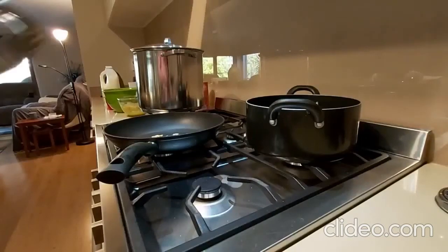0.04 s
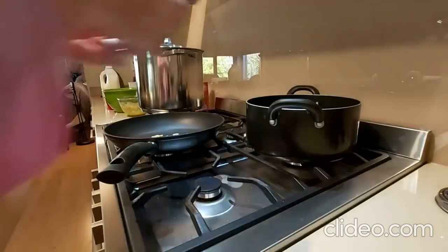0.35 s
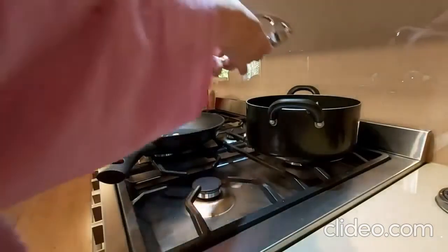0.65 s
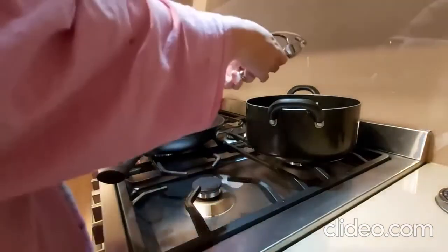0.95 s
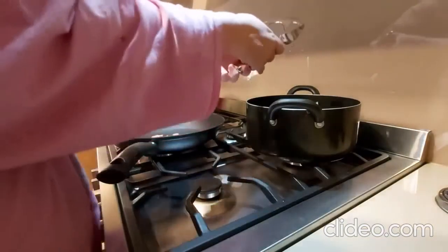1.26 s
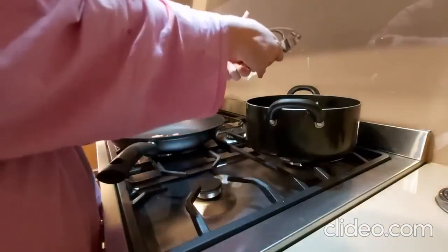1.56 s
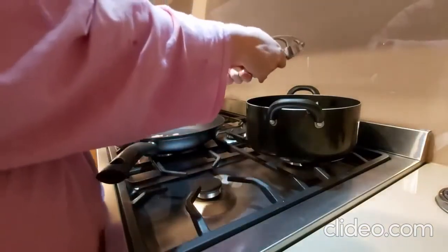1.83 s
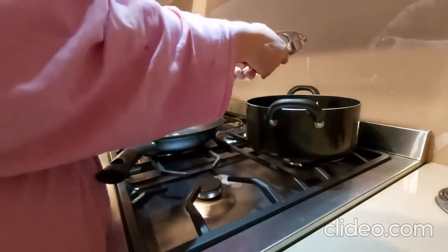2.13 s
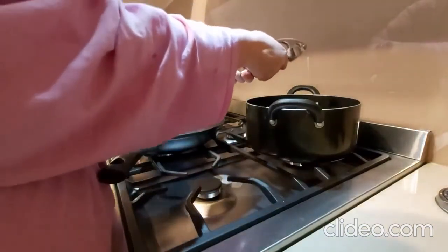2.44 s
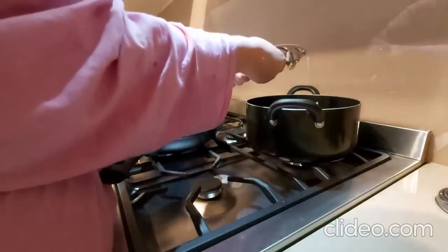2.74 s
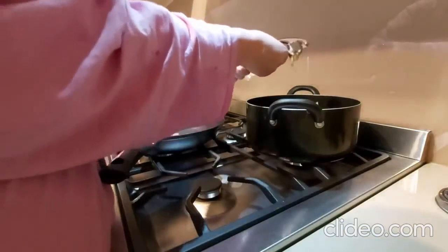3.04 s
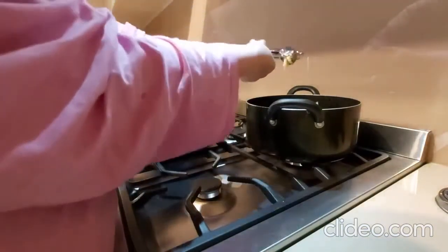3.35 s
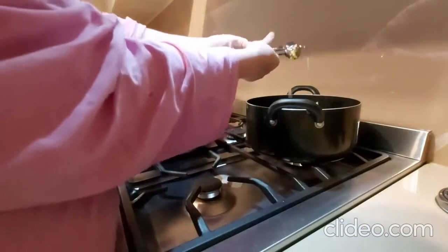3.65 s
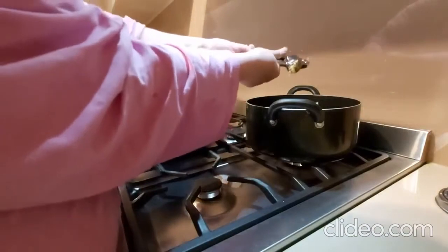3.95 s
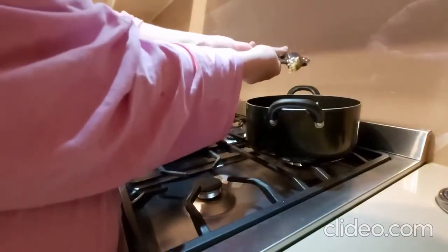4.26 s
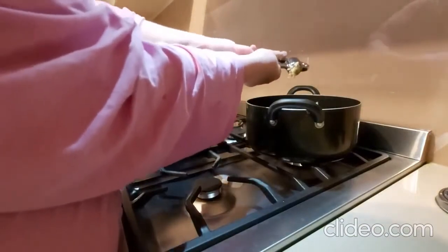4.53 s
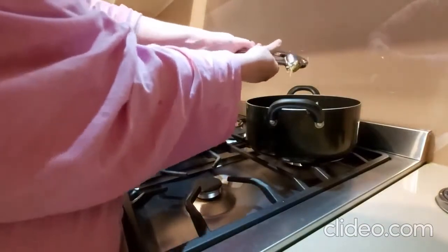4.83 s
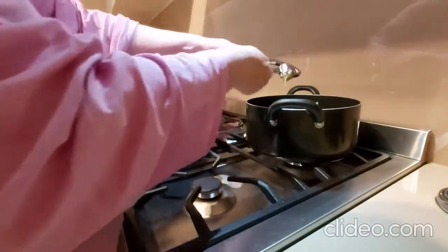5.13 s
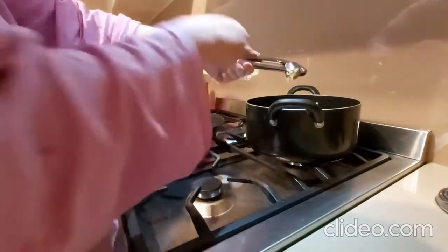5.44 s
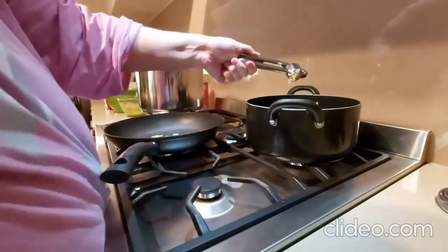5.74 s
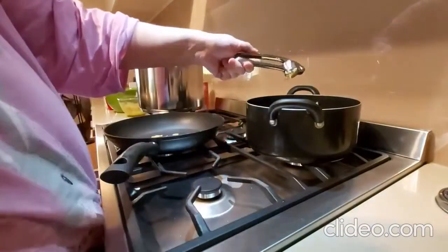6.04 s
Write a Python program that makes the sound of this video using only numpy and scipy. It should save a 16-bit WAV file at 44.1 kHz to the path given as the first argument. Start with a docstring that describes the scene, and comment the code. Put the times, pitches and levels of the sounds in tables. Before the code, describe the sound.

A steady low hum, like a fan, fills a small kitchen. Close to the microphone, a loose sleeve rustles softly throughout as someone handles steel tongs. The tongs give short runs of light, bright clicks and scrapes with a faint ring, mostly in the first half. After that it is mainly the rustling cloth, with a few soft, dull handling bumps over the hum.

```python
"""A steady low hum, like a fan's, fills a small kitchen, and a loose sleeve rustles over it
as its fibres catch and let go. Steel tongs are gripped and shifted in the hands above a stove,
close to a phone. Steel slips on steel in short runs of clicks and scrapes that rattle the hinge
and leave the arms ringing faintly. The handling adds a few soft bumps."""
import sys
import numpy as np
from scipy import signal
from scipy.fft import rfft, irfft
from scipy.io import wavfile
from scipy.ndimage import uniform_filter1d

SR = 44100
rng = np.random.default_rng(int(sys.argv[2]) if len(sys.argv) > 2 else 0)


def wav_out(sig):
    """Save sig, one row per channel (or a flat mono array), as 16-bit PCM at SR to the path in sys.argv[1]."""
    wavfile.write(sys.argv[1], SR, np.round(np.clip(np.atleast_2d(sig).T, -1, 1) * 32767).astype(np.int16))


N = 268569
TIME_S = np.arange(N) / SR
FREQ_HZ = np.maximum(np.arange(N // 2 + 1) * SR / N, 1)


def undb(db):
    """Decibels to gain."""
    return 10 ** (np.asarray(db) / 20)


def unit_rms(x):
    """Scale to an rms of one."""
    return x / np.sqrt(np.mean(x ** 2))


def curve(points, column=1, freq_hz=FREQ_HZ):
    """One table column, interpolated over log frequency."""
    table = np.array(points, float)
    return np.interp(np.log(freq_hz), np.log(table[:, 0]), table[:, column])


def colour(x, spectrum):
    """Shape the spectrum of x, keeping the power of white input."""
    return irfft(rfft(x) * unit_rms(undb(curve(spectrum))), N)


def noise():
    """Two independent white noises, one per path to the microphones."""
    return rng.standard_normal((2, N))


def wander(per_s):
    """Random levels, held 1 / per_s seconds and smoothed twice; unit rms."""
    hold = int(SR / per_s)
    steps = np.repeat(rng.standard_normal(N // hold + 1), hold)
    return unit_rms(uniform_filter1d(uniform_filter1d(steps, hold), hold)[:N])


def slips(per_s, spread_db):
    """Dense train of tiny clicks of uneven size."""
    happens = rng.random(N) < per_s / SR
    size = undb(spread_db * np.minimum(rng.exponential(size=N), 4))
    return unit_rms(noise() * happens * size)


def swell(peak_s, rise_s, fade_s):
    """Pressure builds exponentially to a peak, then lets go."""
    out = np.zeros(N)
    near = slice(*np.searchsorted(TIME_S, [peak_s - 10 * rise_s, peak_s + 10 * fade_s]))
    t = TIME_S[near] - peak_s
    out[near] = np.exp(-np.maximum(-t / rise_s, t / fade_s))
    return out


def shimmer(x, depth_db):
    """Each strip of the spectrum swells and sinks at random, giving a patchy, flickering texture."""
    cells = signal.stft(x, nperseg=256)[2]
    drift = rng.standard_normal(cells.shape[1:])
    for axis in (0, 1, 1):  # once over frequency, twice over time
        drift = uniform_filter1d(drift, 6, axis=axis)
    gain = unit_rms(undb(depth_db * unit_rms(drift)))
    return signal.istft(cells * gain)[1][:, :N]


def resonance(hz, width_hz):
    """Gain over frequency of a steep-sided resonance."""
    return 1 / (1 + ((FREQ_HZ ** 2 - hz ** 2) / (FREQ_HZ * width_hz)) ** 2)


# Moving air. Each row: frequency in Hz, relative density in dB.
AIR_SPECTRUM = [(20, -46), (50, -18), (80, -14.5), (105, -5), (200, -7.5), (250, 3), (340, -0.5), (450, -1),
                (550, -17.5), (750, -12), (860, -15.5), (980, -13), (1200, -20.5), (1400, -18.5),
                (1900, -37), (6000, -73)]
# Resonances in the hum. Each row: centre in Hz, width in Hz, rms level in dB.
HUM_RESONANCES = [(109.4, 11, -71), (160.8, 26.5, -67), (334.8, 26, -61), (445, 25, -65.5),
                  (690, 44, -77.5), (1058, 36, -72)]
# Brief swells and dips of the low hum. Each row: centre in seconds, change in dB.
HUM_SURGES = [(0.66, -5.5), (1.48, 4), (1.66, 4.5), (2.42, 5), (2.54, 3), (3.71, 5.5), (3.98, -5.5),
              (4.13, -5)]


def hum(air_db=-53.5, surge_s=0.028, surge_below_hz=520):
    """Moving air, mostly below 500 Hz, with narrow resonances; the low part swells and dips."""
    air = undb(air_db + 0.84 * wander(per_s=12)) * colour(noise(), AIR_SPECTRUM)
    peaks = sum(undb(db) * unit_rms(resonance(hz, width_hz)) for hz, width_hz, db in HUM_RESONANCES)
    steady = air + irfft(rfft(noise()) * peaks, N)
    low = irfft(rfft(steady) * (FREQ_HZ < surge_below_hz), N)
    surge_db = sum(db * np.exp(-((TIME_S - at_s) / surge_s) ** 2) for at_s, db in HUM_SURGES)
    return steady + (undb(surge_db) - 1) * low


# Handling bumps and rubs. Each row: peak in seconds, level in dB, centre in Hz, width in octaves.
HANDLING_BUMPS = [(2.775, -52.5, 113, 0.74), (4.36, -51, 115, 0.33), (4.422, -55.5, 1040, 0.19),
                  (4.465, -49, 362, 0.72), (4.49, -47.5, 150, 0.8), (4.87, -55.5, 136, 0.45),
                  (5.95, -58, 127, 1)]


def bumps(rise_s=0.033, fade_s=0.026):
    """Soft contacts, too slow to click: each is a short swell in one noise band."""
    out, rubbing = np.zeros((2, N)), noise()
    for peak_s, db, hz, octaves in HANDLING_BUMPS:
        edges_hz = hz * 2 ** (np.array([-0.5, 0.5]) * octaves)
        band = signal.butter(2, edges_hz, "band", fs=SR, output="sos")
        out += undb(db) * swell(peak_s, rise_s, fade_s) * unit_rms(signal.sosfilt(band, rubbing))
    return out


# Briskness of the sleeved arm. Each row: time in seconds, relative rustle level in dB.
ARM_MOTION = [(0, -57.5), (0.3, -56.5), (0.7, -54.5), (0.92, -57.5), (1.14, -57.5), (1.38, -59),
              (1.56, -58.5), (1.76, -53), (1.94, -56), (2.12, -62.5), (2.28, -49), (2.42, -58.5),
              (2.6, -61), (2.76, -52.5), (2.98, -57.5), (3.42, -60.5), (3.9, -58.5), (4.12, -69),
              (4.27, -59), (4.66, -56.5), (4.78, -59), (5.1, -59.5), (5.3, -61), (5.42, -57.5), (5.52, -55),
              (5.74, -53), (5.82, -58.5), (6.09, -58.5)]
# Light brushes of sleeve and fingers, and drags of the heavy folds.
# Each row: peak in seconds, level in dB, rise and fade time in seconds.
LIGHT_BRUSHES = [(0.10, -56, 0.11), (0.298, -50.5, 0.0057), (0.356, -48, 0.015), (0.431, -47.5, 0.021),
                 (0.559, -48, 0.019), (0.655, -54, 0.018), (1.07, -48.5, 0.021), (1.299, -54, 0.011),
                 (1.665, -52.5, 0.053), (2.05, -57.5, 0.031), (2.215, -50.5, 0.036), (2.32, -50, 0.029),
                 (2.391, -50, 0.0064), (2.46, -48, 0.011), (2.66, -47, 0.025), (2.696, -45.5, 0.018),
                 (2.815, -53.5, .028), (2.872, -46.5, .017), (3.049, -54, 0.015), (3.199, -52.5, 0.0085),
                 (4.068, -56.5, 0.064), (4.145, -55.5, 0.091), (4.203, -48, 0.0091), (4.335, -54.5, 0.017),
                 (4.43, -55, .016), (4.845, -57, 0.023), (5.135, -54, 0.06), (5.22, -51.5, 0.0078),
                 (5.362, -53, 0.0084), (5.89, -54.5, 0.024), (5.987, -53.5, 0.05)]
FOLD_DRAGS = [(0.42, -60, 0.15), (0.90, -64, 0.066), (2.565, -61.5, 0.038), (2.72, -73, 0.045),
              (4.19, -69, 0.027), (4.911, -57.5, 0.036), (5.54, -66, 0.091), (5.72, -61, 0.19),
              (6.0, -64, 0.13)]
# Bright fibres and dull folds. Each row: frequency in Hz, relative density in dB.
FIBRE_SPECTRUM = [(1500, -7.5), (3400, -23), (4200, -6.5), (5300, -8.5), (6500, -5), (7400, 1.5),
                  (9500, -1.5), (12000, 0.5), (14000, -2.5), (16000, -8.5)]
FOLD_SPECTRUM = [(60, -3), (400, 4), (1200, 3.5), (1800, -13.5), (2400, 0.5), (3400, -6), (4400, 1.5),
                 (6000, -35), (12000, -18)]


def sleeve(fibre_db=-3.5, fold_db=-14):
    """Fibres catch and let go as the arm moves; the heavy folds rub with a duller sound."""
    sway_db = 1.1 * wander(per_s=16)
    motion = undb(np.interp(TIME_S, *np.transpose(ARM_MOTION)) + sway_db)
    catching = undb(1.7 * wander(per_s=70))
    brush_power = sum((undb(db) * swell(at_s, tau_s, tau_s)) ** 2 for at_s, db, tau_s in LIGHT_BRUSHES)
    drag_power = sum((undb(db) * swell(at_s, tau_s, tau_s)) ** 2 for at_s, db, tau_s in FOLD_DRAGS)
    fibre_level = np.sqrt((undb(fibre_db) * motion * catching) ** 2 + brush_power)
    fold_level = np.sqrt((undb(fold_db) * motion) ** 2 + drag_power) * catching
    fibres = colour(fibre_level * slips(per_s=18000, spread_db=0.6), FIBRE_SPECTRUM)
    folds = colour(fold_level * slips(per_s=3500, spread_db=-1.1), FOLD_SPECTRUM)
    return shimmer(fibres + folds, depth_db=3.0)


# Steel arms at a pitch of ARM_PITCH_HZ. Each row: frequency in Hz, relative gain in dB.
ARM_SPECTRUM = [(100, -27), (600, -1), (1700, -31), (2350, -4), (3200, -5), (4100, 18), (5400, 11),
                (6500, 5), (9000, -51), (16000, -38)]
ARM_PITCH_HZ = 4100


def arm_response(pitch_hz, size=256):
    """Short impulse response of the steel arms; a closer grip raises their pitch."""
    freq_hz = np.maximum(np.arange(size // 2 + 1) * SR / size, 1)
    gain = undb(curve(ARM_SPECTRUM, freq_hz=freq_hz * ARM_PITCH_HZ / pitch_hz))
    response = np.roll(irfft(gain), size // 2) * np.hanning(size)
    return response[None] / np.linalg.norm(response)


# Modes of the steel arms. Each row: frequency in Hz, relative level in dB, T60 in seconds.
ARM_MODES = [(2330, 11, .16), (2918, 2, .08), (3413, 2, .06), (3898, -5, .18), (4008, -1, .14),
             (4059, 0, .12), (4114, 0, .1), (4228, -2, .14), (4326, -3, .1), (4485, -1, .16),
             (4752, -5, .12), (5030, -1, .07), (5152, -2, .12), (5249, -2, .14), (5434, -2, .14),
             (5539, -2, .12), (6181, 0.5, .25), (7832, 3, .16)]


def arm_ring(shake):
    """The shaken arms ring on in their modes, damped by the hand."""
    t = TIME_S[:SR // 4]
    ring = sum(undb(db) * np.sin(2 * np.pi * hz * t) * np.exp(-np.log(1000) * t / t60_s)
               for hz, db, t60_s in ARM_MODES)
    return signal.oaconvolve(shake, ring[None] / np.linalg.norm(ring), axes=1)[:, :N]


# Clicks and scrapes. Each row: peak in seconds, relative level in dB, rise in seconds,
# fade in seconds, arm share in dB, arm pitch in Hz, knock share in dB.
TONG_CONTACTS = [ (0.773, -41, 0.024, 0.0063, -3, 4020, -35), (0.814, -40.5, 0.0054, 0.0046, 0, 4000, -30),
                 (0.826, -37.5, 0.0018, 0.002, 3.5, 4100, -32),
                 (0.8293, -32, 0.00025, 0.0031, 3.5, 4120, -33), (0.835, -40.5, 0.001, 0.02, -4, 4300, -19),
                 (0.869, -42.5, 0.0034, 0.048, -5.5, 4300, -18), (0.905, -44, 0.036, 0.043, -9, 4300, -15),
                 (0.966, -46, 0.011, 0.012, -5.5, 4150, -34), (1.011, -39, 0.014, 0.0039, -3.5, 4100, -23),
                 (1.0162, -33.5, 0.0021, 0.0054, -5, 4140, -19.5),
                 (1.04, -51.5, 0.008, 0.054, -5, 4130, -18), (1.225, -52.5, 0.031, 0.016, -12.5, 4100, -28),
                 (1.7026, -40, 0.0004, 0.003, -5, 4660, -26),
                 (1.7043, -35.5, 0.0005, 0.0033, -5, 5500, -24),
                 (1.7116, -39.5, 0.0011, 0.0037, 0, 4600, -28),
                 (1.718, -39.5, 0.0083, 0.024, -6.5, 4800, -26), (1.852, -49, 0.021, 0.02, -9.5, 5170, -36),
                 (2.242, -35.5, 0.0004, 0.0026, -10, 4600, -22),
                 (2.2448, -38, 0.001, 0.01, -7.5, 5130, -24), (2.528, -38, 0.013, 0.017, -19, 5570, -22.5),
                 (2.535, -35, 0.00086, 0.0022, -19, 5600, -18), (2.541, -44, 0.002, 0.016, -21, 5600, -13),
                 (2.718, -42.5, 0.014, 0.019, -10, 3930, -25),
                 (2.876, -54, 0.028, 0.0073, -10, 4040, -14.5), (3.272, -52, 0.0076, 0.0042, -5, 4050, -19),
                 (4.206, -52.5, 0.026, 0.011, -16, 4100, -11)]
# Slipping steel and the dull knock. Each row: frequency in Hz, relative density in dB.
SCRAPE_SPECTRUM = [(200, -6), (1500, -16), (2300, -31), (3200, -25), (4100, -44), (5000, -6), (6400, 6.5),
                   (7800, 10), (11500, 7.5), (14000, 6.5), (16000, -1)]
KNOCK_SPECTRUM = [(150, -23), (600, 5.5), (1300, 8), (1750, 3.5), (2300, 1.5), (3000, 5), (3700, -0.5),
                  (4600, -8), (7000, -37)]


def tongs(scrape_db=-2.5, arms_db=-4.5, ring_db=-8.5):
    """Steel slips on steel; knocks rattle the hinge in the hand and shake the arms."""
    scrape_power, knock_power = np.zeros((2, N))
    arms = np.zeros((2, N))
    chatter = slips(per_s=30000, spread_db=1)
    for peak_s, db, rise_s, fade_s, arm_share_db, pitch_hz, knock_share_db in TONG_CONTACTS:
        force = undb(db) * swell(peak_s, rise_s, fade_s)
        scrape_power += force ** 2
        knock_power += (force * undb(knock_share_db)) ** 2
        near = force > 0
        drive = undb(arm_share_db) * force[near] * chatter[:, near]
        arms[:, near] += signal.fftconvolve(drive, arm_response(pitch_hz), "same", axes=1)
    scrape = colour(np.sqrt(scrape_power) * slips(per_s=30000, spread_db=0.6), SCRAPE_SPECTRUM)
    knock = colour(np.sqrt(knock_power) * noise(), KNOCK_SPECTRUM)
    shake = undb(arms_db) * arms + knock
    contact = shimmer(undb(scrape_db) * scrape + shake, depth_db=1.2)
    return contact + undb(ring_db) * arm_ring(shake)


def kitchen(x, t60_s, wet_db, tails=5, gap_s=0.004):
    """Hard walls and the worktop add a short, dense tail whose pattern shifts as the hands move."""
    t = TIME_S[:SR // 8]
    weights = np.array([wander(per_s=9) for _ in range(tails)])
    out = x
    for share in weights / np.linalg.norm(weights, axis=0):
        tail = rng.standard_normal((2, len(t))) * np.exp(-np.log(1000) * t / t60_s) * (t > gap_s)
        tail /= np.linalg.norm(tail, axis=1, keepdims=True)
        out = out + undb(wet_db) * signal.oaconvolve(x * share, tail, axes=1)[:, :N]
    return out


# Microphone pair. Each row: frequency in Hz, left minus right in dB, coherence from 0 to 1.
MIC_PAIR = [(97, -3.5, 0.91), (434, -4, 0.9), (613, -3, 0.35), (980, -4, 0.4), (1500, -3, 0.99),
            (2760, -4, 0), (4120, 1, 0.25), (5540, -2, 0.9), (5650, 3, 0.68), (7540, -6, 0.9),
            (15000, -6.5, 0.9)]


def microphones(x, left_lag_s=0.00015, lag_from_hz=700, lag_to_hz=4700):
    """Two ports hear similar bass and treble; the midrange differs and reaches the left one later."""
    common, apart = rfft(x)
    balance_db, coherence = curve(MIC_PAIR, column=1), curve(MIC_PAIR, column=2)
    sides = np.array([[1], [-1]])
    pair = common + sides * apart * np.sqrt((1 - coherence) / (1 + coherence))
    lag_s = left_lag_s * ((FREQ_HZ > lag_from_hz) & (FREQ_HZ < lag_to_hz))
    delay = np.exp(-1j * np.pi * FREQ_HZ * lag_s * sides)
    return irfft(pair * undb(sides * balance_db / 2) * delay, N)


def scene():
    """Tongs and sleeve in the kitchen, over the bumps and the hum."""
    handling = kitchen(tongs() + sleeve(), t60_s=0.067, wet_db=-7.0)
    return microphones(handling + bumps() + hum())


def record(dry):
    """The phone cuts the treble above 15.7 kHz."""
    lowpass = signal.ellip(10, 0.2, 75, 15700, fs=SR, output="sos")
    return signal.sosfilt(lowpass, dry)


dry = scene()
out = record(dry)
wav_out(out)
```